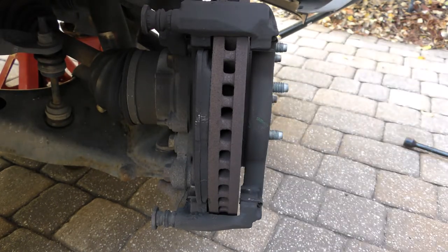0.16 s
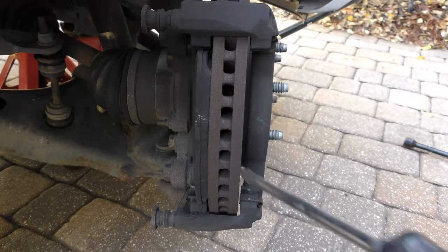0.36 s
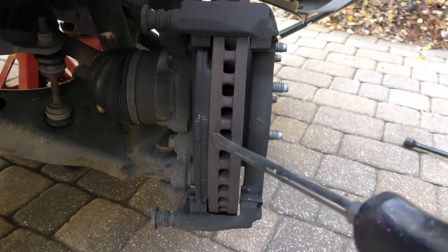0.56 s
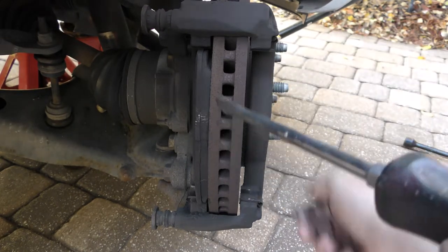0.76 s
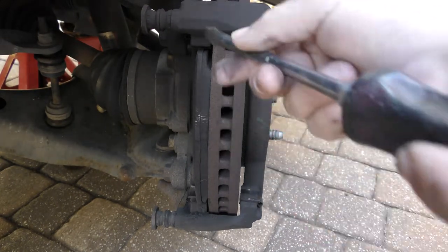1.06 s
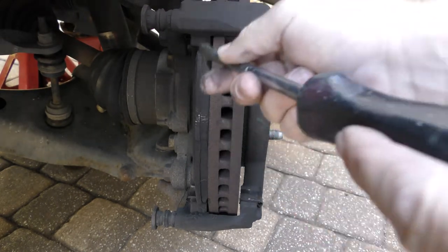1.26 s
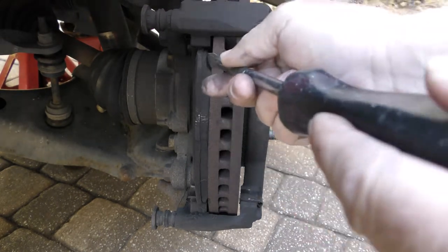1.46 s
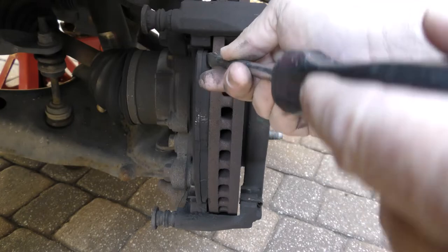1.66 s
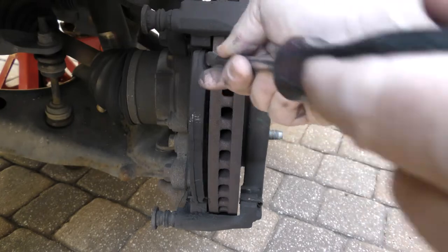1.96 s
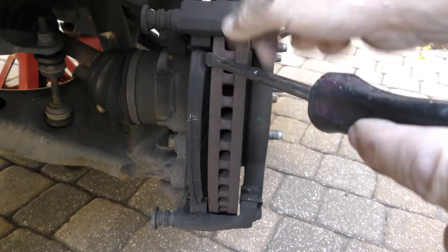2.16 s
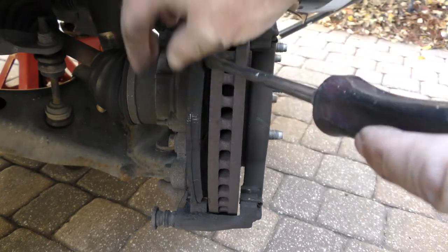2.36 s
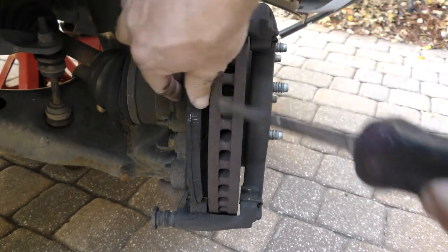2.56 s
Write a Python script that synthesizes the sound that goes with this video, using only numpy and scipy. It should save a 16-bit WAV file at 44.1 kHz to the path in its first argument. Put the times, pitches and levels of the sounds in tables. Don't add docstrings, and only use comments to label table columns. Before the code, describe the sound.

Loose metal tools clatter sharply as a screwdriver is picked up, then its tip knocks, catches and scrapes on a brake disc and pad; close stereo microphone outdoors, with low distant traffic.

```python
import sys
import numpy as np
from scipy import signal
from scipy.io import wavfile

SR = 44100
rng = np.random.default_rng(int(sys.argv[2]) if len(sys.argv) > 2 else 0)


def voltage_ratio(decibels):
    exponent = np.asarray(decibels, float) / 20
    return 10 ** exponent


def wav_record(signal):
    frames = np.transpose(np.atleast_2d(signal))
    bounded = np.clip(frames, -1, 1)
    quanta = np.round(bounded * 32767).astype(np.int16)
    wavfile.write(sys.argv[1], SR, quanta)


N = 119070

# [pitch_hz, level_db, t60_s (time to fade by 60 dB)]
DISC = [(907, -35, 0.87), (1296, 3, 0.014), (2000, -13, 0.082), (2110, -2.5, 0.088), (2216, -12, 0.39),
        (2983, -1.5, 0.017), (3258, -6, 0.052), (3670, -19, 0.12), (6040, -9, 0.034), (8300, -12, 0.026),
        (11100, 1.5, 0.0064)]
LOW_TOP_HZ, MID_TOP_HZ = 1600, 3800


def unit(x):
    return x / np.sqrt(np.mean(x ** 2) + 1e-20)


def band(x, low_hz, high_hz):
    sos = signal.butter(2, [low_hz, min(high_hz, .45 * SR)], "band", fs=SR, output="sos")
    return signal.sosfilt(sos, x + 1e-18)


def at_hz(points, hz):
    table_hz, values = np.transpose(points)
    return np.interp(np.log(hz), np.log(table_hz), values)


def drift(rate_hz):
    r = np.exp(-80 * np.pi * rate_hz / SR)
    noise = rng.standard_normal(N // 40 + 2002)
    slow = signal.lfilter([1], [1, -2 * r, r * r], noise)[2000:]
    return np.interp(np.arange(N) / 40, np.arange(len(slow)), unit(slow))


def clicks(start_s, sizes):
    out = np.zeros(N)
    np.add.at(out, (np.asarray(start_s) * SR).astype(int), sizes)
    return out


def ring(push, hz, t60):
    r, w = voltage_ratio(-60 / (t60 * SR)), 2 * np.pi * hz / SR
    return signal.lfilter([0, np.sin(w)], [1, -2 * r * np.cos(w), r * r], push + 1e-18)


def fading(start_s, db, t60):
    return signal.lfilter([1], [1, -voltage_ratio(-60 / (t60 * SR))], clicks(start_s, voltage_ratio(db)) + 1e-18)


def strikes(rows, modes, ring_db, crack_db, crack_t60, tick_db, tail_db, tail_t60,
            thud_hz, thud_t60, thud_db):
    start_s, peak, low, treble, thud = np.transpose(rows)
    start_s = start_s + .0007
    mid = peak - 16
    luck = rng.normal(0, 2.2, (len(start_s), len(modes)))
    *noise, dull, rattle, rebounds = rng.standard_normal((6, N))

    push = clicks(start_s, voltage_ratio(thud + 37.0)) + dull * fading(start_s, thud + 12, thud_t60)
    out = voltage_ratio(thud_db) * band(band(push, *thud_hz), *thud_hz)
    out += band(rattle * fading(start_s, mid + tail_db, tail_t60), 450, MID_TOP_HZ)

    groups = [(low, 800, LOW_TOP_HZ), (mid, LOW_TOP_HZ, MID_TOP_HZ), (treble, MID_TOP_HZ, 13000)]
    for j, (db, low_hz, high_hz) in enumerate(groups):
        crack = voltage_ratio(crack_db[j]) * noise[j] * fading(start_s, db, crack_t60[j])
        tick = clicks(start_s, voltage_ratio(db + tick_db[j]))
        part = band(crack + tick, low_hz, high_hz)
        for k, (hz, level_db, t60) in enumerate(modes):
            if low_hz < hz < high_hz:
                strength = db + level_db + ring_db + luck[:, k] * (hz > LOW_TOP_HZ)
                chatter = rebounds * fading(start_s, strength - 20, 0.012)
                part += ring(clicks(start_s, voltage_ratio(strength)) + chatter, hz, t60)
        out += band(part, low_hz / 1.3, high_hz * 1.1)
    return out


def loose_tools():
    # [start_s, middle_peak_db, low_db, treble_db, thud_db]
    knocks = [(0.3195, -41, -61, -55, -49), (0.3603, -15, -20, -38.5, -29), (0.385, -12.5, -27.5, -52, -45),
              (0.393, -30, -30, -43, -34.5), (0.399, -15, -26, -43, -38), (0.409, -10, -23.5, -30, -37),
              (0.4134, -11.5, -58, -41, -52), (0.4327, -9, -30.5, -61, -61), (0.4414, -18, -32, -46, -61),
              (0.478, -25.5, -36, -49.5, -40), (0.484, -32, -42, -44, -51), (0.4956, -22.5, -31, -70, -48),
              (0.5621, -9, -24.5, -42, -30.5), (0.5692, -1.5, -23.5, -27, -33),
              (0.5731, -26, -33.5, -37, -47), (0.5772, -7, -24, -36, -47), (0.583, -38, -37, -43, -59),
              (0.588, -42, -42, -54, -62)]
    # [start_s, middle_peak_db, low_db, treble_db, thud_db]
    landing = [
        (0.1045, -24, -47.5, -40, -64),
        (0.2102, -7.5, -20, -31, -27.5),
        (0.2145, -16.5, -27, -29.5, -57),
        (0.2424, -40, -57, -44.5, -52),
        (0.6489, -31, -40, -57, -48),
        (0.7115, -15, -27, -44.5, -34),
        (0.7155, -17.5, -35, -47.5, -48),
    ]
    # [pitch_hz, level_db, t60_s]
    tool_modes = [(1167.8, 4.5, 0.036), (1187.6, -19.5, 0.25), (1396, -9, 0.037), (1850, -8.5, 0.068),
                  (2105, 2, 0.011), (2148, -4.5, 0.081), (2277, -4, 0.046), (2490, 4, 0.0095),
                  (3160, -8.5, 0.1), (4220, -6, 0.093), (4600, -7, 0.051), (6800, -6, 0.05),
                  (8100, -16, 0.073), (9300, -9, 0.034)]
    damped = [(hz, db, t60 * 0.56) for hz, db, t60 in tool_modes]
    out = strikes(knocks, tool_modes, ring_db=2.5, crack_db=[0.1, 7, 3], crack_t60=[.03, .03, .04],
                  tick_db=[25, 30, 18], tail_db=-3.5, tail_t60=0.078,
                  thud_hz=[140, 470], thud_t60=0.09, thud_db=2.5)
    out += strikes(landing, damped, ring_db=2.5, crack_db=[0.1, 6, 3], crack_t60=[.02, .02, .03],
                   tick_db=[25, 28, 17], tail_db=-1.5, tail_t60=0.09,
                   thud_hz=[140, 470], thud_t60=0.1, thud_db=7.0)
    return out


def tip_touches():
    # [start_s, middle_peak_db, low_db, treble_db, thud_db]
    touches = [(1.287, -25, -36, -51, -35), (1.3162, -8.5, -34, -39, -27.5), (1.3216, -20, -31, -33, -42),
               (1.831, -25, -65, -38, -38), (2.1138, -30, -55, -44, -60), (2.3007, -42, -54, -43.5, -48),
               (2.3325, -24, -35, -55, -44), (2.3365, -17.5, -31, -57, -39), (2.346, -30, -50, -48, -53),
               (2.355, -22.5, -50, -52, -45), (2.3625, -24, -54, -52, -35), (2.4225, -19, -45, -50, -43)]
    return strikes(touches, DISC, ring_db=-3.5, crack_db=[3, 8, 3], crack_t60=[.02, .02, .015],
                   tick_db=[20.5, 22, 14], tail_db=-12, tail_t60=0.12,
                   thud_hz=[170, 450], thud_t60=0.039, thud_db=2.0)


def blade_catches():
    # [start_s, middle_peak_db, treble_db]
    catches = [(1.1598, -47, -69), (1.167, -44, -62), (1.1763, -33.5, -58), (1.1825, -36, -50.5),
               (1.347, -35, -60), (1.351, -42, -44), (1.36, -36, -52), (1.369, -23.5, -48),
               (1.374, -34, -44), (1.377, -29, -36), (1.3823, -35, -40.5), (1.391, -24.5, -49),
               (1.41, -30, -46), (1.4145, -29, -46), (1.418, -31, -54), (1.642, -34.5, -62),
               (1.654, -34, -54), (1.6736, -39, -50), (1.741, -44, -58), (1.77, -35, -49),
               (1.9158, -32.5, -45), (1.927, -27.5, -39), (2.397, -37, -46), (2.4025, -19.5, -37),
               (2.407, -20, -40), (2.4165, -26.5, -40), (2.4222, -13, -24), (2.429, -18, -38),
               (2.4353, -40, -43), (2.4419, -24, -37)]
    # [pitch_hz, level_db, t60_s]
    blade = [(1324, 1, 0.026), (2036, -3.5, 0.022), (2160, -16.5, 0.19), (2950, -5.5, 0.0094),
             (3163, 0, 0.023), (3248, 0.5, 0.034), (3670, -20, 0.19), (4600, -9.5, 0.045), (5930, -5, 0.02),
             (7900, -10, 0.011), (8820, -5, 0.014), (10600, -7, 0.0067)]
    rows = [(s, db, db - 23, treble, db - 24) for s, db, treble in catches]
    return strikes(rows, blade, ring_db=3, crack_db=[3, 1.5, 1.5], crack_t60=[.015, .015, .012],
                   tick_db=[20.5, 21, 16], tail_db=-7.5, tail_t60=0.092,
                   thud_hz=[170, 450], thud_t60=0.093, thud_db=2.0)


def scrapes():
    # [start_s, length_s, middle_db, treble_db]
    strokes = [(0.096, 0.04, -41, -50), (1.166, 0.047, -53.5, -60), (1.341, 0.099, -45.5, -58),
               (1.493, 0.022, -49, -58), (1.541, 0.034, -48.5, -75), (1.625, 0.051, -41.5, -48),
               (1.666, 0.079, -65, -70), (1.73, 0.031, -41.5, -47), (1.763, 0.033, -41, -49),
               (1.788, 0.064, -42.5, -69), (1.955, 0.049, -54, -48), (2.001, 0.13, -54, -51.5),
               (2.16, 0.066, -85, -56.5), (2.295, 0.15, -43.5, -47), (2.384, 0.072, -44.5, -40),
               (2.435, 0.062, -50.5, -49)]
    edge_s, grit_per_s, grit_spread_db = 0.017, 5000, 4.5
    t = np.arange(N) / SR
    sizes = voltage_ratio(grit_spread_db * np.minimum(rng.exponential(1, N), 4))
    hits = rng.random(N) < grit_per_s / SR
    grit = unit(sizes * rng.choice([-1, 1], N) * hits)
    grit = grit * voltage_ratio(3 * drift(60))

    mid_swell, treble_swell = np.zeros(N), np.zeros(N)
    for s, length, mid_db, treble_db in strokes:
        stroke = np.clip(np.minimum(t - s, s + length - t) / edge_s, 0, 1)
        mid_swell += voltage_ratio(mid_db) * stroke
        treble_swell += voltage_ratio(treble_db) * stroke
    mid, treble = grit * mid_swell, grit * treble_swell

    rings = sum(voltage_ratio(db) * ring(mid, hz, min(t60, .07)) for hz, db, t60 in DISC if hz < MID_TOP_HZ)
    hiss = band(treble, 7200, 12500) + 0.13 * band(treble, 5100, 22000)
    return voltage_ratio(-28.5) * rings + voltage_ratio(1) * band(mid, 920, 5300) + voltage_ratio(-0.5) * hiss


def snaps():
    # [start_s, level_db, pitch_hz, pan_db (left minus right), t60_s]
    clip_snaps = [
        (0.1469, -31.5, 11600, -3, 0.018),
        (1.7842, -34, 8800, 1, 0.045),
        (1.787, -24, 8900, 2.5, 0.02),
        (1.7896, -19, 9300, 6.5, 0.019),
        (1.79, -25, 9300, 4, 0.081),
        (1.953, -30.5, 11870, 5.5, 0.056),
    ]
    spread = 0.1
    out = np.zeros((2, N))
    for s, level_db, hz, pan_db, t60 in clip_snaps:
        grain_db = 4 * rng.standard_normal(N // 30 + 1).repeat(30)[:N]
        grains = rng.standard_normal(N) * voltage_ratio(grain_db)
        rattle = grains * fading([s], [level_db], t60) + clicks([s], voltage_ratio([level_db + 14]))
        one = 3 * band(rattle, hz * (1 - spread), hz * (1 + spread))
        one += voltage_ratio(-4.5) * band(rattle, 2570, 7600)
        one += voltage_ratio(3.5) * band(rattle, 12300, 16000)
        out += one * voltage_ratio([[pan_db / 2], [-pan_db / 2]])
    return out


def bumps():
    # [start_s, peak_db, pitch_hz, t60_s]
    handle_bumps = [
        (0.32, -25.5, 331, 0.049),
        (0.569, -26.5, 92.5, 0.063),
        (0.2135, -50, 118, 0.079),
        (1.316, -32, 120, 0.035),
        (1.81, -31, 290, 0.03),
        (1.829, -31.5, 292, 0.041),
        (1.8355, -31, 304, 0.027),
    ]
    # [start_s, peak_db, pitch_hz, t60_s]
    lingers = [
        (2.337, -41, 2187, 0.3),
        (2.364, -46.5, 2185, 0.46),
        (2.43, -46, 3670, 0.26),
    ]
    out = np.zeros(N)
    for s, db, hz, t60 in handle_bumps + lingers:
        out += band(ring(clicks([s], voltage_ratio([db])), hz, t60), hz / 2, hz * 4)
    return out


def rubs():
    # [start_s, length_s, level_db]
    slides = [
        (0.0, 0.25, -58),
        (0.098, 0.022, -47),
        (0.322, 0.056, -52.5),
        (1.007, 0.083, -66),
        (1.365, 0.029, -58),
        (1.611, 0.079, -51),
        (1.686, 0.096, -66),
        (1.99, 0.18, -56.5),
        (2.52, 0.043, -57.5),
    ]
    t = np.arange(N) / SR
    swell = sum(voltage_ratio(db) * np.sin(np.pi * np.clip((t - s) / length, 0, 1)) for s, length, db in slides)
    mid, side = band(rng.standard_normal((2, N)), 9900, 16000)
    return swell * voltage_ratio(2 * drift(40)) * unit(mid + 0.38 * side * [[1], [-1]])


def surroundings(x):
    t = np.arange(SR // 2) / SR
    noise = rng.standard_normal((3, len(t)))
    tail = band(noise[:2], 290, 5700) * voltage_ratio(-60 * t / 0.79) * (t > .008)
    near = band(noise[2], 320, 21300) * voltage_ratio(-60 * t / .01) * [[1], [-1]]
    reply = voltage_ratio(-22.5) * unit(tail) + voltage_ratio(-12.5) * unit(near)
    return signal.fftconvolve(x[None], reply / np.sqrt(len(t)), axes=1)[:, :N]


def yard():
    # [pitch_hz, level_db (per Hz)]
    traffic_tone = [(15, -41), (25, -11.5), (170, 0), (607, -16.5), (1560, -20), (2110, -23), (6560, -36),
                    (12200, -30), (16000, -39.5)]
    # [pitch_hz, likeness (0 to 1)]
    likeness = [(60, 0.83), (240, 0.8), (950, 0.76), (3770, 0.6), (15000, 0.97)]
    # [pitch_hz, left_minus_right_db]
    balance = [(60, -5.5), (380, 0.5), (2380, 2), (15000, -1)]
    # [time_s, level_db]
    traffic_swell = [(0, 2), (.7, 2.5), (0.998, -1), (1.25, 1), (1.9, 2), (2.7, 0)]
    # [time_s, level_db]
    drone_level = [(0, -58), (1.301, -61), (1.45, -48), (1.699, -46.5), (1.75, -63), (1.85, -45),
                   (2, -61.5), (2.25, -56), (2.7, -53.5)]
    t = np.arange(N) / SR
    traffic, together = 0, drift(4)
    edges = 31 * 2 ** np.arange(0, 9.5, .5)
    white = rng.standard_normal((2, 2, N))
    for k, (low, high) in enumerate(zip(edges, edges[1:])):
        mid, side = band(white[k % 2], low, high)
        hz = np.sqrt(low * high)
        alike, lean = np.clip(at_hz(likeness, hz), 0, 1), at_hz(balance, hz) / 2
        flicker_db = 1.5 * (.7 * together + drift(22))
        gain = voltage_ratio(at_hz(traffic_tone, hz) + flicker_db)
        stereo = np.sqrt(1 + alike) * mid + np.sqrt(1 - alike) * side * [[1], [-1]]
        traffic = traffic + gain * voltage_ratio([[lean], [-lean]]) * stereo
    traffic = voltage_ratio(-47.5 + np.interp(t, *np.transpose(traffic_swell))) * unit(traffic)

    drone_hz = 161.8 + 5.17 / 2 * drift(6.56)
    drone = np.sqrt(2) * np.sin(2 * np.pi * np.cumsum(drone_hz) / SR)
    drone_db = np.interp(t, *np.transpose(drone_level)) + 2 * drift(2.6)
    return traffic + drone * voltage_ratio(drone_db + np.array([[-1.5], [1.5]]))


def scene():
    tools = loose_tools()
    brake = tip_touches() + blade_catches() + scrapes()
    clips = snaps()
    out = tools * voltage_ratio([[.6], [-.6]]) + brake * voltage_ratio([[-.9], [.9]])
    out = out + clips + bumps() + rubs()
    return out + surroundings(tools + brake + clips.mean(axis=0)) + yard()


def band_limit(x):
    return signal.sosfilt(signal.butter(12, 16960, fs=SR, output="sos"), x)


def record(dry):
    top = signal.cheby2(8, 40, 16250, fs=SR, output="sos")
    mix = signal.sosfilt(top, dry)
    return band_limit(mix)


dry = scene()
out = record(dry)
wav_record(out)
```